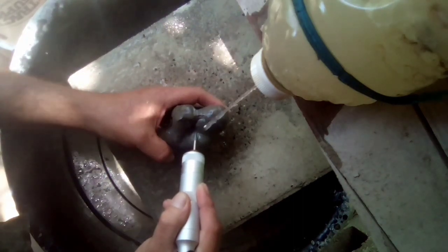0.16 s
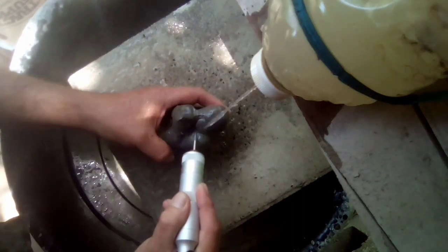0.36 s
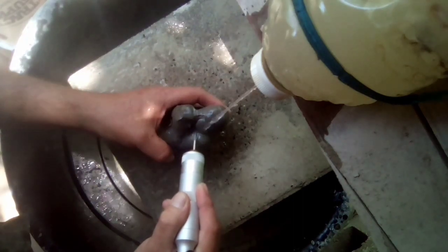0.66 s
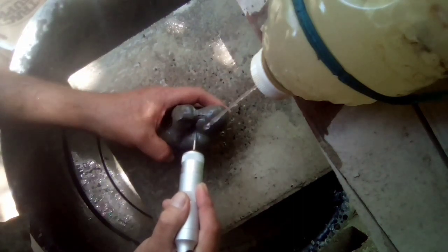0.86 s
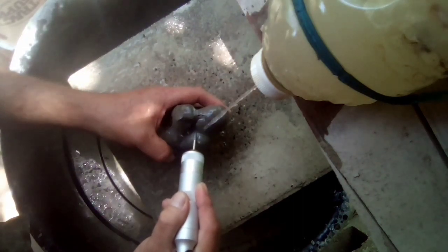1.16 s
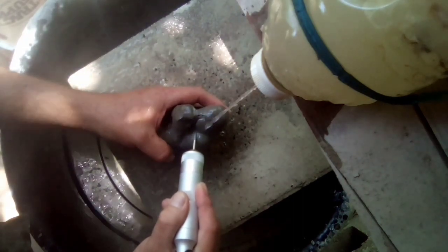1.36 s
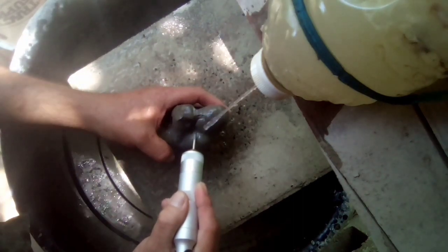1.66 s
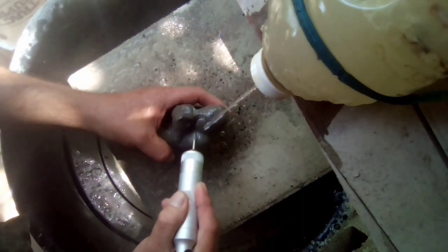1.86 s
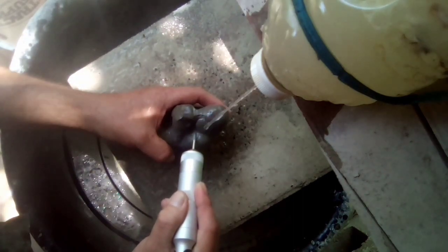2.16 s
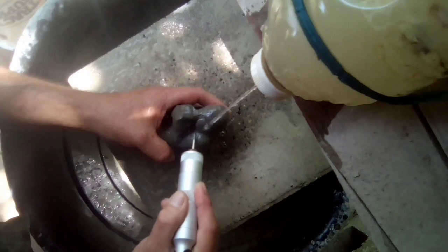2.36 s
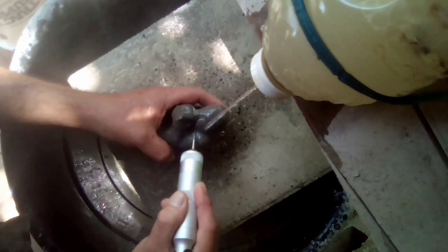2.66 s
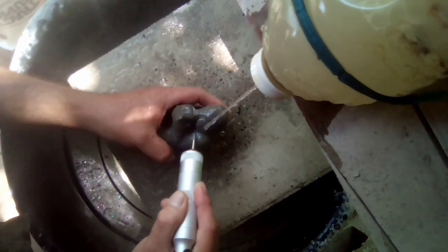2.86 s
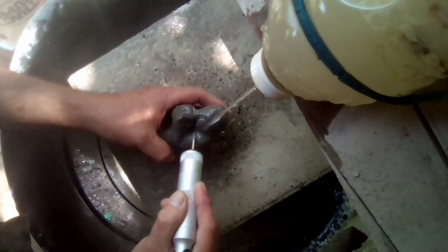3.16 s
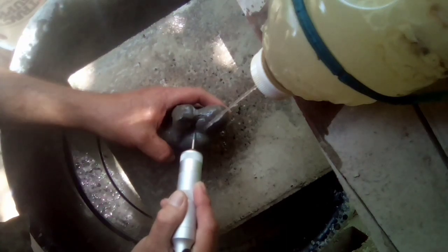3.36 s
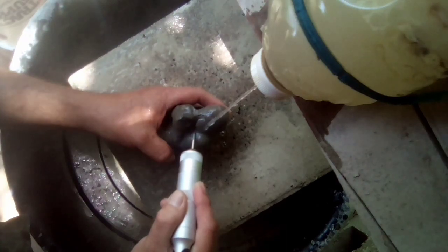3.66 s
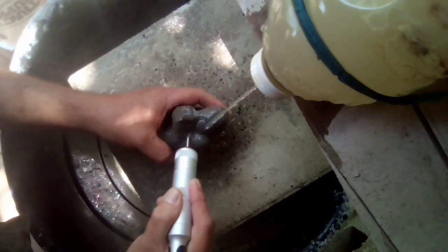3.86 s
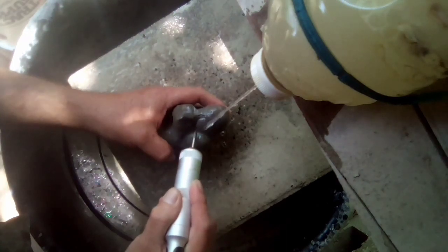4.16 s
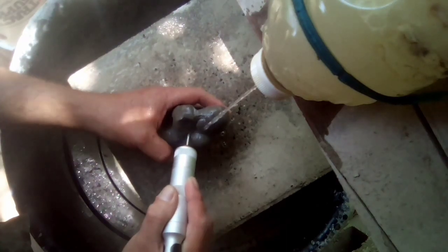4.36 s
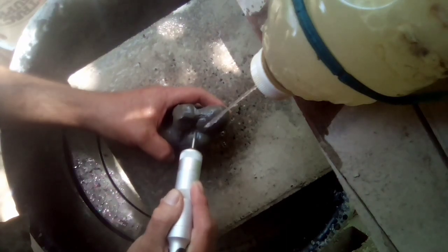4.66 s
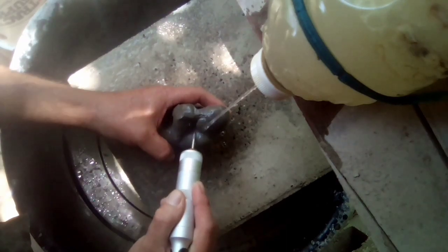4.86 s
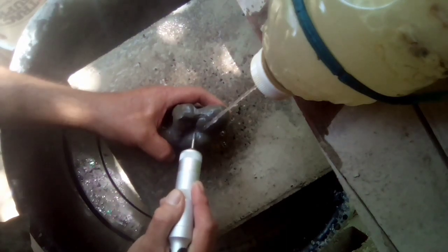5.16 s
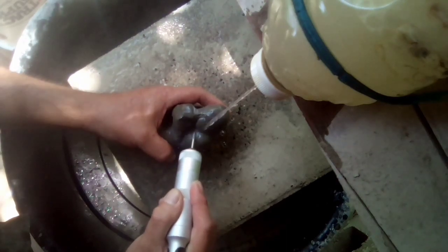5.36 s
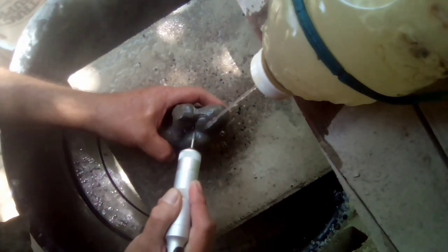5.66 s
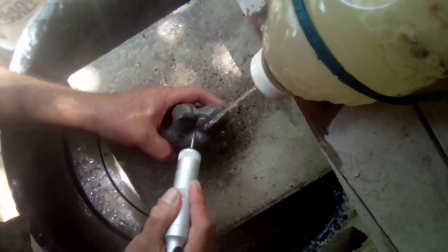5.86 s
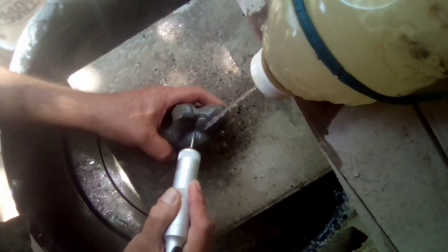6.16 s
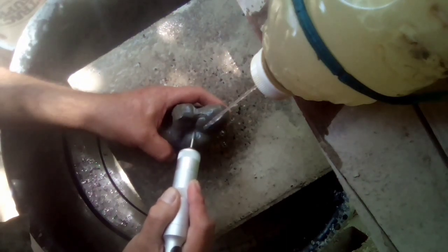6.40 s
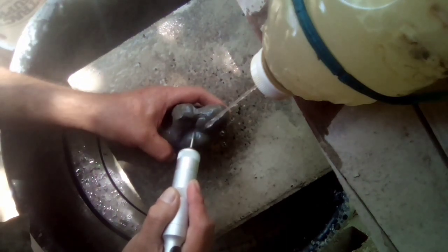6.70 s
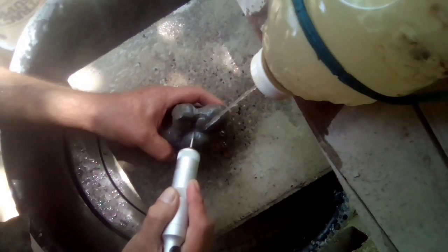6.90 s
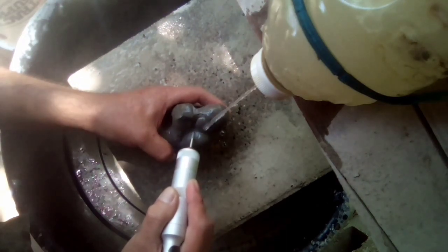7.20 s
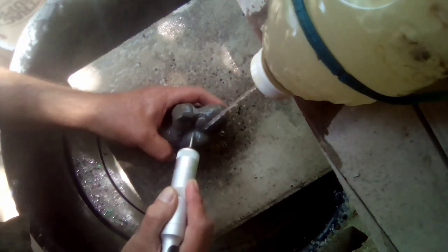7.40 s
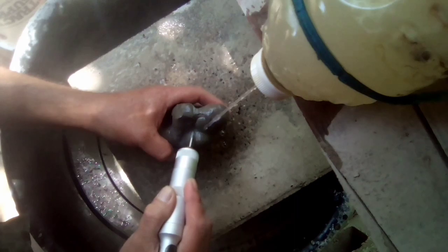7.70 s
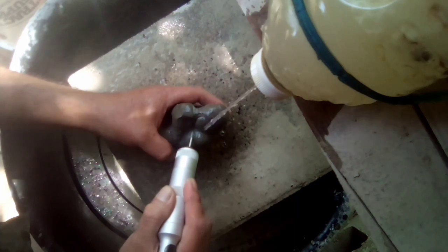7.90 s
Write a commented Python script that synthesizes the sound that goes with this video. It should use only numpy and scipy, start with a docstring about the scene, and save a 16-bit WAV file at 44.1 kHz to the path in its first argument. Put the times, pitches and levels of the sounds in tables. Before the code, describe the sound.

Outdoors, a microphone close to a small rotary tool grinding a wet stone on a board, mono and dry with only very short nearby reflections. From 0 seconds the sound is in full flow: a dense, bright, gritty rasp, a fast buzzing once per turn, and a steady high motor whine over a faint low hum. Beneath it, trickling water and the shaking stone drum softly on the hollow board. Tiny bumps and a hand tremor make the grinding waver, with small nudges near 1.3, 1.9 and 2.9 seconds. Around 4 seconds the hand eases off; the pitch climbs slightly until about 4.8, the hum swells and a thin, high sizzle joins. From about 5.4 the pitch slides down, and the sizzle disappears by 6. The steady loaded grinding continues, with a stronger bump near 7.1, through to the end at about 8 seconds without stopping.

```python
"""Outdoors, a mono microphone close to a rotary tool whose diamond bit grinds a wet stone held on a board.
From the start grit rasps in random blows, strongest once a turn; the motor whines on multiples of about 133 Hz.
A thin stream of cooling water splatters on the hollow board, heard as random blows ringing its resonances.
Near 4 s the hand eases off: the pitch climbs until about 4.8 s and a thin, high sizzle joins in.
By 6 s the sizzle is gone; the pitch sinks back, while bumps nudge the grinding to the end."""
import sys
import numpy as np
from scipy import signal
from scipy.fft import rfft, irfft, next_fast_len
from scipy.io import wavfile
from scipy.ndimage import uniform_filter1d

SR = 44100
rng = np.random.default_rng(int(sys.argv[2]) if len(sys.argv) > 2 else 0)


def bounce(signal):
    """Save signal as a 16-bit WAV file at the path given by the first command-line argument."""
    frames = np.transpose(np.atleast_2d(signal))
    limited = np.clip(frames, -1, 1)
    pcm = np.round(limited * 32767).astype(np.int16)
    wavfile.write(sys.argv[1], SR, pcm)


N = 354563
TIME_S = np.arange(N) / SR


def undb(db):
    """Decibels to gain."""
    return 10 ** (np.asarray(db) / 20)


def unit(x):
    """Scale to rms 1."""
    return x / np.sqrt(np.mean(x ** 2))


def curves(table):
    """Interpolate each column of a table over its first column, time in s."""
    time_s, *columns = np.transpose(table)
    return [np.interp(TIME_S, time_s, column) for column in columns]


def walk(rate):
    """Random levels held 1 / rate s and smoothed twice; spread near 1."""
    hold = int(SR / rate)
    steps = np.repeat(rng.standard_normal(N // hold + 1), hold)
    smooth = uniform_filter1d(uniform_filter1d(steps, hold), hold)
    return 1.3 * smooth[:N]  # make up for the spread lost in smoothing


def filtered(x, response):
    """Pass x through a response given as a function of Hz."""
    size = next_fast_len(N + SR // 4)
    hz = np.maximum(np.arange(size // 2 + 1) * SR / size, 1)
    return irfft(rfft(x, size) * response(hz), size)[:N]


def colour(x, points):
    """Shape x by (Hz, dB) points, falling away below the first; rms 1."""
    hz, db = np.transpose(points)

    def response(f):
        low_cut = np.minimum(f / hz[0], 1) ** 2
        return undb(np.interp(np.log(f), np.log(hz), db)) * low_cut

    return unit(filtered(x, response))


def ring(x, modes, flutter_db):
    """Ring (Hz, width Hz, dB) resonances with x, each driven now harder, now softer; rms 1."""
    total = np.zeros(N)
    for hz, width, db in modes:
        mode = filtered(x, lambda f: 1 / (1 + 1j * (f * f - hz * hz) / (f * width)))
        total += undb(db + flutter_db * walk(16)) * mode
    return unit(total)


def impacts(rate, scatter_db):
    """Tiny blows of either sign at random moments, their strengths scattered in dB; rms 1."""
    struck = rng.random(N) < rate / SR
    sign = np.sign(rng.standard_normal(N))
    return unit(struck * sign * undb(scatter_db * rng.standard_normal(N)))


def tone(turns):
    """A sine of rms 1 with a random start."""
    return np.sqrt(2) * np.sin(2 * np.pi * (turns + rng.random()))


# colour of the rasp on the stone: pitch_hz, level_db (relative)
RASP_COLOUR = [(500, -27), (1200, -20.5), (1900, -3.5), (2400, -3), (3700, -7.5), (4400, -4), (5000, -1.5),
               (6000, 1), (6650, 0.5), (7400, -5), (8300, -17), (11000, -24.5), (13700, -28.5),
               (14900, -19.5)]
# resonances of the tool's housing and shank: pitch_hz, width_hz, level_db (relative)
HOUSING_MODES = [(1493, 30, -4.5), (1634, 49, -3), (2180, 67, -17), (2700, 115, -1.5), (3440, 63, 0),
                 (4340, 65, 0.5), (4415, 96, 1.5), (4905, 115, 2), (5790, 116, 2), (6370, 100, -1),
                 (6550, 59, 4)]


def rasp(turns, bump_db, level_db=-30.5, slope_db_per_s=-0.04, housing_top_hz=7000):
    """Grit breaks from the stone all the time, most in the arc where the off-centre bit digs in."""
    bite, arc_turns, scatter_db = .57, .11, 2.5
    angle = (turns + .5) % 1 - .5  # in turns, 0 where the bit digs in
    dig_in = np.exp(-(angle / arc_turns) ** 2) * undb(scatter_db * walk(130))
    force = 1 + bite * dig_in
    stone = colour(impacts(rate=20000, scatter_db=2.5) * force, RASP_COLOUR)
    housing = ring(rng.standard_normal(N) * force, HOUSING_MODES, flutter_db=0.7)
    # the housing's ring falls away steeply above about 7 kHz
    housing = filtered(housing, lambda f: 1 / (1 + (f / housing_top_hz) ** 8))
    grit = undb(-0.85) * stone + undb(-4.0) * housing
    return undb(level_db + slope_db_per_s * TIME_S + bump_db) * grit  # the hand slowly relaxes


# reflections from the board, the water jug and the tyre below: delay_s, gain
REFLECTIONS = [(.0013, 0.17), (.00355, 0.13), (.00445, .09)]


def reflect(x):
    """Surfaces within a metre send the rasp back late and colour it."""
    def response(f):
        return 1 + sum(gain * np.exp(-2j * np.pi * f * delay_s) for delay_s, gain in REFLECTIONS)

    return filtered(x, response)


# speed of the shaft before its small sways: time_s, speed_hz (turns per second)
SHAFT_SPEED = [(0.08, 133.08), (0.5, 132.92), (1, 132.71), (1.5, 132.89), (2, 133.04), (2.8, 133.13),
               (3.5, 133.35), (3.88, 133.46), (3.98, 133.4), (4.15, 134.26), (4.45, 135.0), (4.75, 135.61),
               (5.3, 135.48), (5.65, 134.63), (6, 134.13), (6.5, 133.74), (7.3, 133.56), (7.95, 133.42)]


def shaft_speed():
    """Speed in turns per second: it rises when the hand eases off."""
    speed_hz, = curves(SHAFT_SPEED)
    return speed_hz


def shaft(speed_hz, tremor_hz=8.06, swing_hz=0.062, flutter_hz=0.039):
    """Turns made so far; the tremor of the hand sways the load, and the speed with it."""
    sway = swing_hz * tone(tremor_hz * TIME_S)
    return np.cumsum(speed_hz + sway + flutter_hz * walk(60)) / SR


def load_off(speed_hz):
    """How far the hand has eased off, 0-1: the less load, the more speed."""
    loaded_hz = np.median(speed_hz)
    return np.clip((speed_hz - loaded_hz) / (speed_hz.max() - loaded_hz), 0, 1)


# unbalance of the shaft: multiple of the speed, level_db (relative), load_off_change_db
UNBALANCE_TONES = [(1, -12.3, 5.5), (2, 0, 3.2)]
# clean tones of fan blades and commutator bars: multiple, level_db (relative), load_off_change_db
WHINE_TONES = [(18, -4.9, -2), (24, -9.3, 2.2), (48, -.4, .4), (70, -26.5, -4)]
INERTIA_S = 0.26  # the speed lags behind the load by the inertia of the rotor


def motor(turns, eased, unbalance_db=-44.5, whine_db=-34, waver_db=0.74, shake_db=0.75):
    """Unbalance hums, louder as soon as the stone lets the bit go; fan blades and commutator bars whine."""
    slope = uniform_filter1d(np.gradient(eased) * SR, size=4410)
    freed = np.clip(eased + INERTIA_S * slope, 0, 1)  # the load, ahead of the speed
    hum, whine = np.zeros(N), np.zeros(N)
    for k, db, free_db in UNBALANCE_TONES:
        hum += undb(db + free_db * np.maximum(freed, eased) + shake_db * walk(20)) * tone(k * turns)
    for k, db, free_db in WHINE_TONES:
        whine += undb(db + free_db * eased + waver_db * walk(18)) * tone(k * turns)
    return undb(unbalance_db) * hum + undb(whine_db) * whine


ORDER_COUNT = 116  # multiples of the shaft speed
BOOM_ORDER = 3  # the multiple left to the boom of the board


def timing():
    """Lag of each multiple, in its own cycles: a swaying spread plus random scatter softens the knock in each turn."""
    sway, spacing, disorder = .24, 1 / 11, .12
    spread = sway * np.sin(2 * np.pi * (spacing * np.arange(ORDER_COUNT) + rng.random()))
    return np.cumsum(spread) + disorder * rng.standard_normal(ORDER_COUNT)


# unsteady tones of brushes and bearings: multiple, level_db (before level_db below), load_off_change_db
BEARING_TONES = [(5, -55, 0), (7, -60, 2.5), (8, -61.5, 5), (11, -57.5, 0), (15, -54, 0), (16, -51, -1),
                 (22, -52, -4), (23, -57, 6), (29, -53.5, 5), (30, -52.5, 0), (31, -48, -9), (33, -54, 4),
                 (37, -51.5, 1), (38, -51, -2), (39, -56, 8), (40, -45.5, -5), (42, -48, 0), (43, -48, 1),
                 (44, -44, -4), (45, -46.5, -3), (46, -47, -1), (47, -46.5, -3), (50, -46, -2),
                 (58, -60, 0), (60, -63, 0), (74, -69, 0), (76, -69, 0), (112, -70, 0)]


def bearings(turns, lag, eased, level_db=1.35, waver_db=2.0, slip=0.026):
    """Each knock of the bit loads the bearings; their tones waver, and shift in strength as the load comes off."""
    tones = np.zeros(N)
    for k, db, free_db in BEARING_TONES:
        cycles = k * turns - lag[k - 1] + slip * walk(25)
        tones += undb(db + free_db * eased + waver_db * walk(6)) * np.cos(2 * np.pi * cycles)
    return np.sqrt(2) * tones * undb(level_db)


# buzz of the bit knocking once a turn, on all other multiples: multiple, level_db (before level_db below)
BUZZ_COLOUR = [(4, -62), (9, -62), (13, -63), (20, -56), (27, -60), (34, -56), (45, -51), (52, -58),
               (57, -66), (63, -71), (76, -77), (100, -83), (112, -76)]


def buzz(turns, lag, level_db=1.5, uneven_db=2.2, scatter_db=1.3, size=8192):
    """One buzzing knock pattern repeats every turn, stronger on some turns than on others."""
    k = np.arange(1, ORDER_COUNT + 1)
    own_tones = [BOOM_ORDER] + [row[0] for row in [*UNBALANCE_TONES, *WHINE_TONES, *BEARING_TONES]]
    order_db = np.interp(k, *np.transpose(BUZZ_COLOUR)) + uneven_db * rng.standard_normal(ORDER_COUNT)
    gain = undb(order_db) * ~np.isin(k, own_tones)
    spectrum = np.r_[0, gain * np.exp(-2j * np.pi * lag)]
    one_turn = irfft(spectrum, size) * size / np.sqrt(2)
    pattern = np.interp(turns % 1, np.arange(size) / size, one_turn)
    return pattern * undb(scatter_db * walk(130) + level_db)


# the bit catches on a bump or skips over a hollow: centre_s, length_s, rasp_change_db, board_change_db
BUMP_EVENTS = [(0.046, .08, -1.5, 3), (.17, 0.052, 0, 1.5), (1.27, 0.066, -2.5, -0.5), (1.91, .07, 0, 3.5),
               (2.198, .1, 0.5, 1), (2.928, .09, 0, 3.5), (3.808, 0.051, 0, -0.5), (4.13, 0.077, 0.5, 1),
               (5.39, 0.08, 1.5, 3.5), (6.04, 0.07, -0.5, -1), (6.9, 0.055, -1.8, -2),
               (7.057, 0.061, .8, 5), (7.733, 0.064, 0.5, 2.5), (7.96, .2, -1, 0.5)]


def bumps():
    """Change of rasp and board in dB: each bump comes and goes as a smooth bell."""
    change_db = np.zeros((2, N))
    for centre_s, length_s, rasp_db, board_db in BUMP_EVENTS:
        bell = np.exp(-(2 * (TIME_S - centre_s) / length_s) ** 2)
        change_db += np.outer([rasp_db, board_db], bell)
    return change_db


def hand(tremor_hz=8.5, tremor_db=0.21, rough_db=0.54):
    """Gain from the pressure on the bit: the hand trembles and the stone is uneven."""
    tremor = tone(np.cumsum(tremor_hz * (1 + 0.203 * walk(6))) / SR)
    return undb(tremor_db * tremor + rough_db * walk(55))


# resonances of the board and the hollow under it: pitch_hz, width_hz, level_db (relative)
BOARD_MODES = [(211, 43, -9.5), (394.6, 13, -2.5), (446, 92, -2), (652.6, 83, 4), (734.4, 9, 1.5),
               (922, 36, -12)]


def board(bump_db, level_db=-39.5, slope_db_per_s=-0.2132, bass_hz=50):
    """Falling water and the shaking stone drum on the board, which radiates little bass."""
    drumming = ring(impacts(rate=6000, scatter_db=2), BOARD_MODES, flutter_db=0.86)
    drumming = filtered(drumming, lambda f: 1 / (1 + bass_hz / (1j * f)))
    return undb(level_db + slope_db_per_s * TIME_S + bump_db) * drumming


def boom(turns, eased, level_db=-46.5, slope_db_per_s=-.5, free_db=-1.5, waver_db=2.0):
    """The stone pressed on the board drives its lowest strong resonance, less when the hand eases off."""
    boom_db = level_db + slope_db_per_s * TIME_S + free_db * eased
    return undb(boom_db + waver_db * walk(18)) * tone(BOOM_ORDER * turns)


# the bit skating on the stone: time_s, level_db
SKID_LEVEL = [(3.95, -65), (4.2, -42), (4.5, -40), (4.7, -46), (5.4, -44), (6.0, -65)]
# its ring: pitch_hz, width_hz, level_db (relative)
SKID_MODES = [(7180, 130, 0)]


def skid():
    """The lightly loaded bit skates on the wet stone with a thin, high sizzle: noise in a narrow ring."""
    level_db, = curves(SKID_LEVEL)
    return undb(level_db) * ring(rng.standard_normal(N), SKID_MODES, flutter_db=0.0)


def low_hum(pitch_hz=161, level_db=-59.8):
    """A steady low sine behind the work."""
    return undb(level_db) * tone(pitch_hz * TIME_S)


def scene():
    """Tool, stone and board in one spot, close to the mono microphone."""
    speed_hz = shaft_speed()
    eased = load_off(speed_hz)
    turns, lag = shaft(speed_hz), timing()
    rasp_bump_db, board_bump_db = bumps()
    knocks = bearings(turns, lag, eased) + buzz(turns, lag)
    # the bit rides over the uneven stone, so knocks, rasp and board surge together
    grinding = hand() * (reflect(rasp(turns, rasp_bump_db)) + knocks + board(board_bump_db))
    mono = grinding + motor(turns, eased) + boom(turns, eased) + skid() + low_hum()
    return np.tile(mono, (2, 1))


def record(dry, top_hz=15450):
    """The recorder cuts the top steeply."""
    return signal.sosfilt(signal.ellip(12, .1, 80, top_hz, fs=SR, output="sos"), dry)


dry = scene()
out = record(dry)
bounce(out)
```